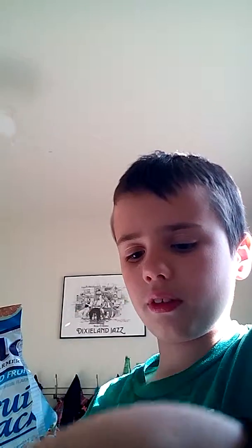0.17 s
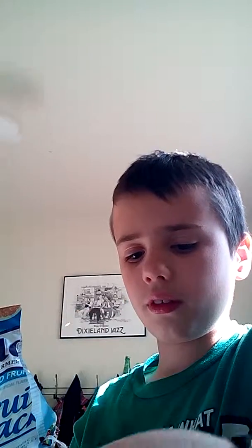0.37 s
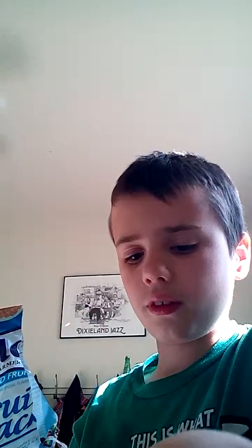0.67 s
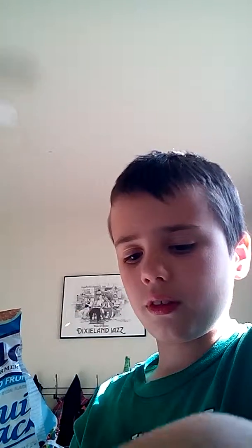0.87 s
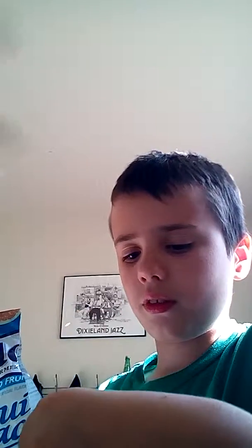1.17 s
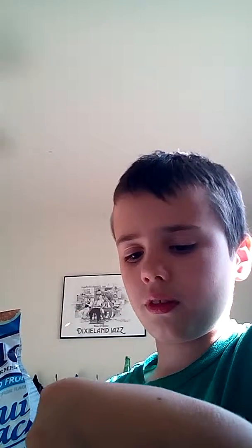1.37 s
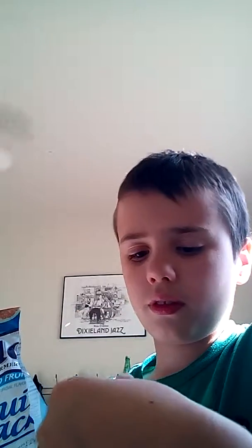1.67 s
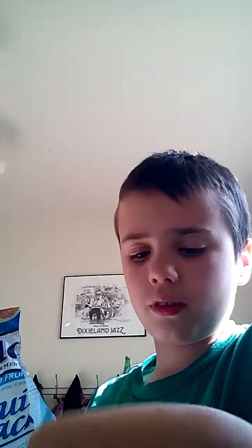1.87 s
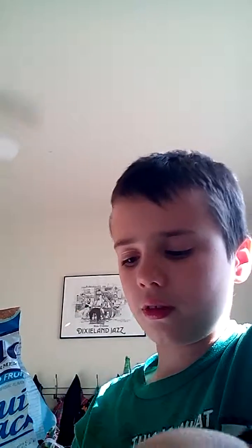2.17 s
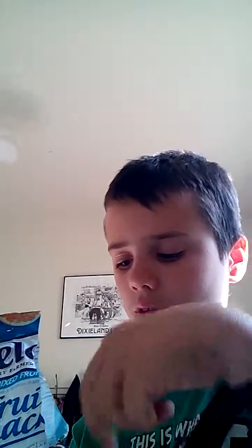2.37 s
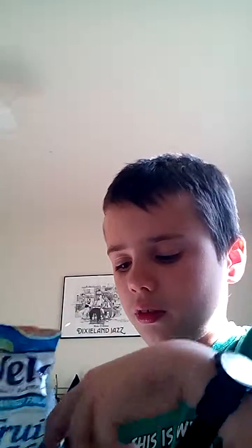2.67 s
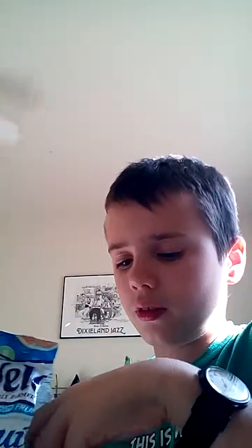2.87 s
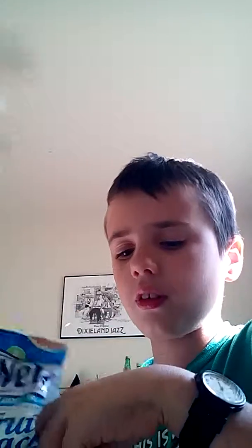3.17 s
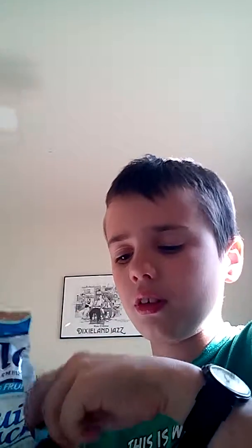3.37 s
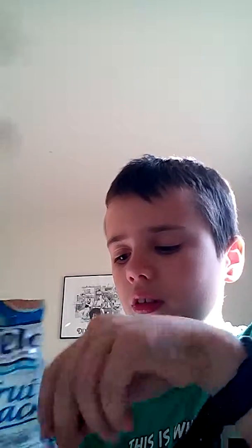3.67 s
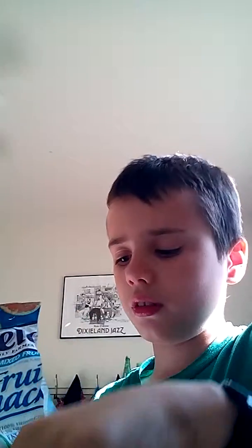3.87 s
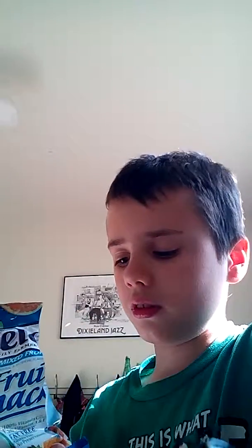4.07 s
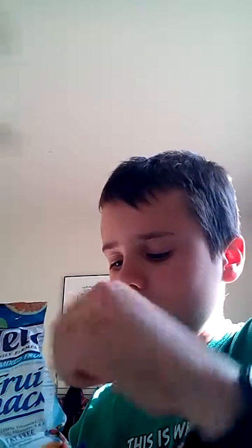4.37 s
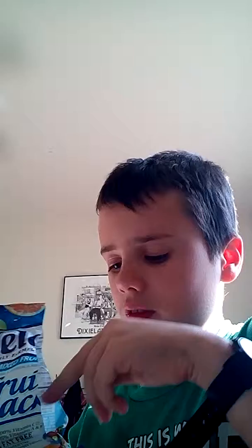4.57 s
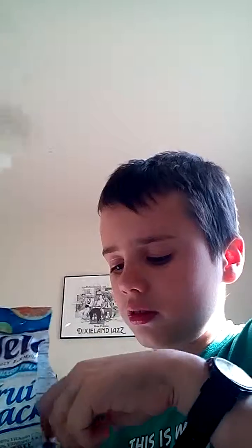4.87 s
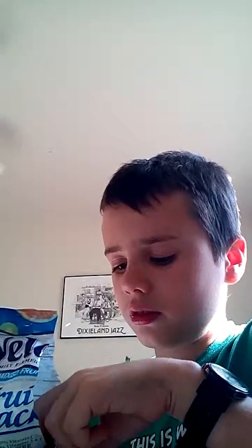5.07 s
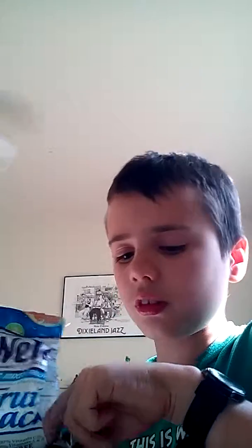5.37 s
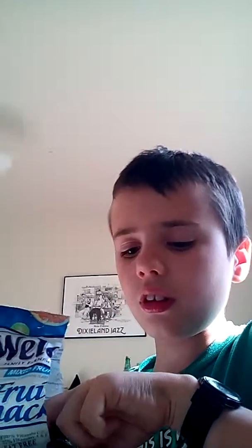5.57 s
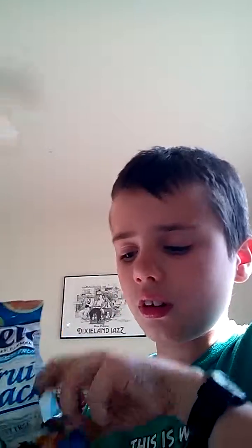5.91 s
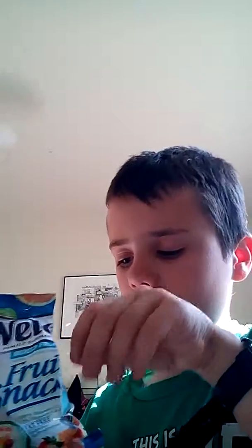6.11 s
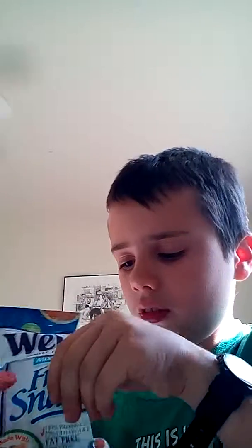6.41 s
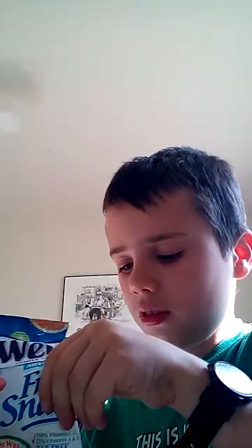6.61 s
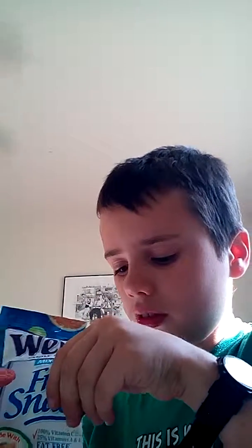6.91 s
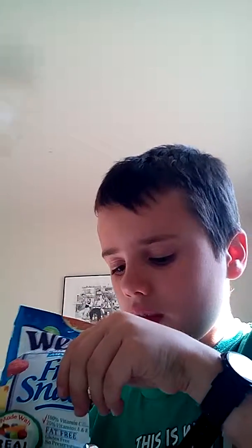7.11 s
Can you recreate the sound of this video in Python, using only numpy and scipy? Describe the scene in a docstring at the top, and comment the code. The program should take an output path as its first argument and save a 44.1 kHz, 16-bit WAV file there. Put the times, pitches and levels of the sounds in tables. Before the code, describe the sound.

Indoors, an appliance hums low under a faint hiss. Fingertips thud softly on a table, and a single crease ticks in a stiff plastic snack pouch. Then fingers dig in, making bright snaps over a fine crackle and brief rubs of skin on plastic. In a lull the fingertips land again, and a second, longer handful crunches on. The pouch is close, just left of the microphone.

```python
"""Indoors, an appliance hums under room air and the hiss of a phone's two microphone ports.
Fingertips thud on the table at about half a second, then a lone crease ticks in a stiff plastic snack
pouch just left of the phone. From 2.3 s fingers dig in: creases buckle in bright snaps over a fine
crackle and the rub of skin on film. In a lull near 4.3 s the fingertips land again, and a second handful
crunches on until about 7 s. The difference between the two ports spreads the treble wide."""
import sys
import numpy as np
from scipy import signal
from scipy.fft import rfft, irfft, next_fast_len
from scipy.io import wavfile

SR = 44100
rng = np.random.default_rng(int(sys.argv[2]) if len(sys.argv) > 2 else 0)


def transcribe(u):
    """Save the signal u as a 16-bit wav file named by the first command-line argument.

    u: samples, shape (n,) or (channels, n), limited to [-1, 1]; the rate is SR.
    q: integer samples, one column per channel.
    """
    v = np.clip(np.atleast_2d(u).T, -1, 1)
    q = np.round(v * 32767).astype(np.int16)
    wavfile.write(sys.argv[1], SR, q)


N = 319636
HZ = np.fft.rfftfreq(next_fast_len(N), 1 / SR)

# The appliance's resonances. Each row: centre in Hz, width in Hz, RMS level in dB.
HUM_BANDS = [(60.3, 4.7, -53), (104.1, 6.3, -44.5), (136.4, 35.4, -45.5), (203.8, 8.6, -48),
             (482.5, 11, -68.5)]
# The tone of room air and port hiss. Each row: frequency in Hz, relative level in dB.
AIR_TONE = [(13, -66), (22, -39.5), (36, -26), (48, -1), (202, -2.5), (295, -18), (389, -21.5), (420, -28),
            (476, -22.5), (712, -32.5), (1370, -37.5), (5220, -38), (6380, -30), (7810, -40.5), (9080, -70),
            (11800, -103), (20000, -120)]
# The stereo width of that air. Each row: frequency in Hz, side level over mid in dB.
AIR_WIDTH = [(60, -23.5), (100, -21), (180, -20), (310, -17), (550, -11.5), (950, -5), (1650, -7.5),
             (2860, -3.5), (4970, 1), (8630, 11.5)]
# Fingertips landing. Each row: start in seconds, tick peak in dB, table ring over the tick in dB.
FINGER_TAPS = [(0.555, -33, 15.5), (0.5866, -39.5, 18.5), (0.613, -44.5, 9.5), (2.36, -38, 4),
               (2.3838, -48.5, 17.5), (4.34, -38, 11.5), (4.36, -33, 9.5), (4.381, -31, 16)]
# The table top's modes. Each row: pitch in Hz, relative level in dB, time to fall 60 dB in seconds.
TABLE_MODES = [(113, -1, 0.058), (208, -3.5, 0.096), (322, -18.5, 0.093), (423, 1, 0.02),
               (873, -26.5, 0.049), (1254, -24.5, 0.039)]
# The featured creases. Each row: start in seconds, peak in dB, ring pitch in Hz, then three tone trims
# in dB: body (up to about 1 kHz), mids (near 2 kHz) and top (from about 7 kHz).
CREASES = [(0.8468, -38.5, 3300, -8, -15, -22), (2.4693, -37, 5600, -20, -24, -24),
           (2.6694, -31, 1730, 0, -16, -20), (2.7482, -30, 3340, -3, -19, -26),
           (2.8822, -33, 4800, -4, -10, -20), (2.8965, -21, 3550, 0.5, -20, -22),
           (2.9101, -9.5, 3880, -8.5, -20.5, -23), (2.9513, -14.5, 4880, -10, -20, -17),
           (2.9624, -13, 4770, -18, -18, -24), (2.9948, -30, 4940, 0, -18, -17),
           (3.053, -19.5, 4820, 4, -10, -10), (3.0793, -14, 4010, -3, -16, -16.5),
           (3.084, -23, 4040, 0, -20, -21), (3.0962, -5, 4220, -20, -22, -20.5),
           (3.0986, -9, 4680, -3, -24, -13), (3.1264, -20, 5270, -21, -18, -20),
           (3.1477, -21.5, 3520, -5, -19, -23), (3.1954, -7.5, 5070, -8.5, -19, -11),
           (3.2016, -6.5, 4060, -6.5, -19, -19), (3.2162, -10, 4030, -8.5, -31.5, -22),
           (3.242, -19, 6120, -9, -25, -13), (3.252, -21.5, 6100, -11, -14, -14),
           (3.2617, -18.5, 5410, -13, -14, -21), (3.2737, -22, 4880, -16.5, -31, -24),
           (3.2917, -14, 4540, -26, -26, -21), (3.3024, -18, 2960, -11, -12, -14),
           (3.3291, -2, 3650, -11.5, -22, -20), (3.3506, -14, 4270, -27, -28, -12),
           (3.3557, -4, 4500, -22, -27, -15), (3.3654, -17, 4130, -3, -17, -7),
           (3.3688, -2.5, 4100, -22.5, -20, -13), (3.394, -12.5, 4060, -17, -16, -9),
           (3.4357, -10, 4160, -15, -24, -15.5), (3.441, -23.5, 4230, -13, -24, -20),
           (3.488, -15.5, 4150, -11, -25, -23), (3.5196, -12, 4080, -19.5, -23, -18),
           (3.5561, -13, 4630, -26, -31, -29), (3.5872, -18.5, 4400, -19, -16, -13),
           (3.6254, -15.5, 4000, -5, -19.5, -18), (3.7258, -13.5, 4680, -11, -16, -18),
           (3.7297, -5.5, 2420, -8, -16.5, -12), (3.7549, -14.5, 5310, -5, -15, -7),
           (3.7711, -10.5, 4670, -6.5, -15, -12), (3.9577, -26, 2240, 4, -11.5, -27),
           (4.1636, -33, 6100, -27, -34, -16), (4.5072, -34.5, 3820, -28, -29, -24),
           (4.7155, -33, 3500, 5, -17, -19), (4.9354, -26, 4830, -11, -14, -15),
           (4.9569, -27.5, 3400, -6.5, -21, -21), (5.0629, -20, 3300, -11, -7, -31),
           (5.0668, -19.5, 2120, -5, -17.5, -37), (5.1698, -32.5, 4860, -15, -22, -11),
           (5.249, -16, 4940, -9.5, -18, -25), (5.2827, -33, 4430, -14, -13, -2),
           (5.3166, -11.5, 3650, -22, -22, -12), (5.3337, -9, 3970, -25, -22, -22.5),
           (5.4354, -18, 4760, -12, -15, -20), (5.464, -21, 5880, -4, -11, -16),
           (5.474, -25.5, 2620, -19, -15, -22), (5.5736, -14.5, 3700, -10.5, -28, -13.5),
           (5.5839, -7.5, 4980, -8.5, -16, -16), (5.6188, -8.5, 5100, -7, -19, -14),
           (5.6625, -15, 4450, -9, -15, -24), (5.7079, -19.5, 4800, -4, -18, -14),
           (5.7199, -21.5, 4800, -21, -20, -11), (5.7478, -25.5, 1880, -7.5, -14, -21),
           (5.7507, -32, 4280, -11, -13, -14), (5.7936, -5, 5600, -19, -29, -19.5),
           (5.8216, -13.5, 3500, -8, -11, -12), (5.8248, -13, 4900, -8, -21, -17),
           (5.9104, -38, 1570, 6, -6, -11), (5.9312, -18, 3040, -15, -13, -12),
           (5.9557, -6, 4600, -8.5, -17, -14), (5.9638, -16, 6300, -10, -26, -12),
           (6.0015, -18, 7550, -27, -24, -15), (6.0207, -25, 4800, -25, -23, -20),
           (6.0656, -12, 4800, -24.5, -26.5, -24), (6.0924, -19.5, 4270, -29, -26, -15),
           (6.1202, -17.5, 4540, -10, -20, -11), (6.135, -26, 2940, -10, -10, -9),
           (6.1614, -25, 7270, -11, -20, -7), (6.1714, -21.5, 7100, -9, -15, -10),
           (6.1834, -6.5, 4640, -10.5, -23.5, -20), (6.1869, -12.5, 3750, -16, -18, -13),
           (6.2138, -32, 4480, -14, -18, -19), (6.2546, -26, 4800, -2, -12, -19),
           (6.291, -21, 4800, 0, -15, -17.5), (6.4819, -16, 4300, -9.5, -10.5, -14),
           (6.504, -29, 4600, -13, -19, -15), (6.5252, -19, 7070, -8, -24, -21),
           (6.571, -17.5, 2640, 3, -8, -17), (6.5862, -13, 3240, 2.5, -12, -18),
           (6.5977, -5.5, 6720, -7.5, -26, -21.5), (6.6019, -3, 4570, -12, -12, -21.5),
           (6.6071, -7.5, 2620, -9, -14, -19), (6.6131, -27, 6300, -11, -18, -6),
           (6.6189, -5.5, 6800, -5, -15, -13), (6.6436, -7, 3730, -0.5, -12.5, -22.5),
           (6.6514, -13.5, 2560, -7, -12, -27), (6.697, -10, 3870, -4.5, -16, -15),
           (6.7077, -13.5, 3300, -6, -12, -12), (6.7131, -14.5, 1510, 6, -7, -16),
           (6.745, -3.5, 3440, -7.5, -14.5, -20.5), (6.7542, -13.5, 2450, -5, -19, -25),
           (6.7604, -9.5, 2790, -6, -14, -22), (6.7662, -15.5, 3460, -11, -20, -16),
           (6.813, -26.5, 2570, -4.5, -8, -14), (6.8266, -32, 1770, 3, -11, -24),
           (6.9306, -36, 2230, 0, -10, -22), (7.0194, -40, 1670, -9, -13, -14),
           (7.1048, -24.5, 3450, -7, -19, -11.5)]
# How hard the film is worked, one curve per handful. Each point: time in seconds, crackle drive in dB.
HANDFULS = [
    [(2.25, -64.5), (2.86, -69), (2.93, -41.5), (3.07, -41.5), (3.26, -41.5), (3.42, -38), (3.65, -48),
     (3.78, -46), (3.9, -66.5), (4.25, -61.5)],
    [(4.6, -66), (5.19, -56.5), (5.31, -47), (5.55, -51.5), (5.61, -45.5), (5.85, -46.5), (6.03, -50),
     (6.14, -39), (6.26, -53), (6.46, -63), (6.56, -46), (6.62, -32.5), (6.68, -41), (6.79, -52),
     (6.86, -65), (7.0, -65)],
]
# The tone of the crackling film. Each row: frequency in Hz, relative level in dB.
FILM_TONE = [(240, -54.5), (400, -17), (499, -18), (899, -7), (1120, -14), (2190, -9), (3110, -9),
             (4200, -11.5), (7370, -10.5), (9080, -46), (11800, -58), (20000, -120)]
# Skin sliding on film. Each row: start in seconds, length in seconds, crest RMS in dB, centre in Hz.
SKIN_RUBS = [(2.357, 0.1, -60, 4940), (3.04, 0.034, -40, 4800), (3.703, 0.056, -35.5, 5000),
             (4.137, .07, -74.5, 5900), (4.915, 0.055, -46, 4670), (5.156, 0.063, -46, 5000),
             (5.318, 0.057, -40.5, 4200), (5.448, 0.029, -45.5, 6900), (5.82, 0.057, -38, 5040),
             (6.098, 0.056, -39.5, 5400), (6.508, 0.029, -54, 7000)]
# The pouch's balance between the ports. Each row: frequency in Hz, left level over right in dB.
PORT_BALANCE = [(100, 7.5), (500, 2), (1000, 3.5), (2900, 4.5), (5000, 10.5), (8600, 8)]
# The left port's head start. Each row: frequency in Hz, phase lead in radians.
PORT_PHASE = [(500, 0), (1900, .3), (3500, .5), (4100, 1.2), (4700, 2.2), (5300, 2.7), (6700, 3.1),
              (9000, 3.1)]


def undb(db):
    """Decibels to gain."""
    return 10 ** (np.asarray(db) / 20)


def level(x, db):
    """Sets the RMS level."""
    return x * undb(db) / np.sqrt(np.mean(x ** 2))


def on_log(table, hz):
    """Table values joined on a log-frequency axis."""
    freqs, values = np.transpose(table)
    return np.interp(np.log(hz + 1), np.log(freqs + 1), values)


def colour(x, gain):
    """Equalises a track with one gain for each frequency in HZ."""
    size = next_fast_len(N)
    return irfft(rfft(x, size) * gain, size)[:N]


def add(out, start, sound):
    """Mixes a sound in at a start time in seconds."""
    i = int(start * SR)
    sound = sound[..., :N - i]
    out[..., i:i + sound.shape[-1]] += sound


def fade(t, t60):
    """A decay that falls 60 dB in t60 seconds."""
    return np.exp(-np.log(1000) * t / t60)


def hum_and_air(air_db=-39.5):
    """The bed, as mid and side: an appliance drones in low resonances under room air and port hiss."""
    noise = rng.standard_normal((2 + len(HUM_BANDS), N))
    tone = undb(on_log(AIR_TONE, HZ))
    mid = colour(noise[0], tone)
    side = colour(noise[1], tone * undb(on_log(AIR_WIDTH, HZ)))
    bed = np.array([mid, side]) * undb(air_db) / np.std(mid)
    for row, (hz, width, db) in zip(noise[2:], HUM_BANDS):
        resonance = 1 / (1 + (2 * (HZ - hz) / width) ** 2)
        bed[0] += level(colour(row, resonance), db)
    return bed


def finger_thuds(push_s=0.0064, nail_hz=3270, nail_db=8, tick_t60=0.032):
    """A fingertip's soft push rings the table top; the nail adds a tick."""
    out, t = np.zeros(N), np.arange(int(.25 * SR)) / SR
    tick_band = signal.butter(2, [1200, 4800], "bandpass", fs=SR, output="sos")
    nail = signal.iirpeak(nail_hz, Q=8, fs=SR)
    modes = sum(undb(db) * fade(t, t60) * np.sin(2 * np.pi * hz * t) for hz, db, t60 in TABLE_MODES)
    # flesh softens the attack; a small top radiates no deep bass
    low_cut = signal.butter(2, 70, "highpass", fs=SR, output="sos")
    ring = signal.sosfilt(low_cut, modes * (1 - np.exp(-t / push_s)))
    ring /= np.abs(ring).max()
    for start, db, ring_db in FINGER_TAPS:
        noise = rng.standard_normal(len(t))
        tick = signal.sosfilt(tick_band, noise) + undb(nail_db) * signal.lfilter(*nail, noise)
        tick *= fade(t, tick_t60)
        add(out, start, undb(db) * (undb(ring_db) * ring + tick / np.abs(tick).max()))
    return out


def room(x, t60=0.14, wet_db=-15.5):
    """The room answers with a short diffuse tail, as mid and side."""
    t = np.arange(int(.5 * SR)) / SR
    tail = rng.standard_normal((2, len(t))) * fade(t, t60) * (1 - fade(t, 0.03))
    tail /= np.sqrt(np.sum(tail[0] ** 2))
    return undb(wet_db) * signal.fftconvolve(x[None], tail, axes=1)[:, :N]


def snap(noise, ring_hz, body_db, mids_db, top_db, t60, rise_s=0.00067, ring_db=7):
    """A crease buckles and its panel rattles; each row of noise becomes one snap with a peak of 1."""
    size = noise.shape[1]
    t, hz = np.arange(size) / SR, np.fft.rfftfreq(size, 1 / SR)
    crack = undb(4) * fade(t, 0.0022)
    rattle = fade(t, max(t60, .004))
    tail = undb(-24) * fade(t, .08)
    burst = noise * (1 - np.exp(-t / rise_s)) * (crack + rattle + tail)
    burst[0, 0] = undb(10)  # the buckle itself: one jolt that sets the panel ringing
    tone_db = on_log([(200, body_db - 10), (480, body_db + 3.5), (1150, body_db - 0.5),
                      (2100, mids_db + 16), (4300, 0.0082),
                      (7200, top_db + 14), (8300, top_db + 5.5), (9100, top_db - 36)], hz)
    tone_db += ring_db * np.exp(-(np.log((hz + 1) / ring_hz) / 0.15) ** 2)  # the panel favours one pitch
    # minimum phase keeps the attack clean: nothing sounds before the pop
    cepstrum = irfft(tone_db * np.log(10) / 20)
    cepstrum[1:size // 2] *= 2
    cepstrum[size // 2 + 1:] = 0
    pop = irfft(rfft(burst) * np.exp(rfft(cepstrum)), size)
    return pop / np.abs(pop).max(axis=1, keepdims=True)


def crease_snaps(featured_t60=0.0097, small_per_s=45):
    """All creases on three tracks: their sum, their sideways lean, and scatter between the ports."""
    out = np.zeros((3, N))
    small_count = int(small_per_s * N / SR)
    creases = [(*row, featured_t60) for row in CREASES] + list(small_creases(small_count))
    most = len(CREASES) + small_count
    noise, pan_drift = rng.standard_normal((most, 2, 2048)), rng.standard_normal(most)
    for pair, drift, (start, db, *voicing) in zip(noise, pan_drift, creases):
        pan_db = -1 - 0.14 * db + 0.5 * drift  # loud creases sit nearer the middle
        lean = np.tanh(pan_db * np.log(10) / 40)
        direct, scatter = undb(db) * snap(pair, *voicing)
        add(out, start, np.array([direct, lean * direct, scatter]))
    return out


def effort_db(t):
    """How hard the fingers work the film at times t; silent outside the handfuls."""
    return np.max([np.interp(t, *np.transpose(curve), left=-120, right=-120) for curve in HANDFULS], 0)


def small_creases(count, ring_hz=4840, t60=0.019, floor_db=-80):
    """Small creases give way at random, louder with effort; rows as in CREASES plus a decay time."""
    when, force = rng.random((count, 2)).T
    pitch, body, decay, top, mids = rng.standard_normal((count, 5)).T
    start = when * N / SR
    peak_db = effort_db(start) + 7.5 + 12 * force ** 2
    hz = np.clip(ring_hz * 2 ** (0.28 * pitch), 1500, 7800)
    body_db = -10.5 + 4.4 * body
    mids_db = -12.5 + 0.36 * body_db + mids  # a fuller body brings the mids up with it
    top_db = -16 + 2.6 * top
    rows = np.transpose([start, peak_db, hz, body_db, mids_db, top_db, t60 * np.exp(.5 * decay)])
    return rows[peak_db > floor_db]


def crackle(grains_per_s=1000, spread_db=3, grain_t60=0.004, friction_db=-7, low_shelf_db=-6):
    """A fine spray of creases, most tiny and a few larger, over the smooth friction of skin on film."""
    drive = undb(effort_db(np.arange(N) / SR))
    hits = (rng.random(N) < grains_per_s / SR) * undb(spread_db * rng.exponential(size=N))
    envelope = signal.lfilter([1], [1, -fade(1 / SR, grain_t60)], hits)
    grains = level(envelope * rng.standard_normal(N), 0)
    friction = undb(friction_db) * rng.standard_normal(N)
    film = colour(grains + friction, undb(on_log(FILM_TONE, HZ)))
    thinned = colour(film, np.where(HZ < 3000, undb(low_shelf_db), 1))
    return drive * thinned / np.std(film)


def skin_rubs(width_octaves=0.5, size=8192):
    """Skin slides along the film in short, soft swells of friction hiss."""
    out = np.zeros(N)
    hz = np.fft.rfftfreq(size, 1 / SR) + 1
    for start, length, db, centre_hz in SKIN_RUBS:
        band = np.exp(-(np.log2(hz / centre_hz) / width_octaves) ** 2)
        hiss = level(irfft(rfft(rng.standard_normal(size)) * band), db)
        swell = np.hanning(int(length * SR)) ** .5
        add(out, start, hiss[:len(swell)] * swell)
    return out


def scene(scatter_db=-5, room_side_db=-1.5):
    """Mixes bed, table, room and pouch as mid and side, and returns left and right."""
    pops, lean, scatter = crease_snaps()
    pouch = pops + crackle() + skin_rubs()
    thuds = finger_thuds()
    room_mid, room_side = room(pouch + thuds)
    bed_mid, bed_side = hum_and_air()
    # the right port hears the pouch weaker and later; this sets the side signal for a given mid
    right_port = undb(-on_log(PORT_BALANCE, HZ)) * np.exp(-1j * on_log(PORT_PHASE, HZ))
    width = (1 - right_port) / (1 + right_port)
    # hands and phone body scatter each pop differently to the two ports
    diffuse = undb(scatter_db) * scatter + undb(room_side_db) * room_side
    mid = bed_mid + thuds + room_mid + pouch + colour(lean, width)
    side = bed_side + colour(pouch, width) + lean + colour(diffuse, np.abs(width) ** 0.45)
    return np.array([mid + side, mid - side])


def record(dry, dip_hz=1118, dip_width_hz=227, dip_db=-3.5, ceiling=1.05, top_hz=9132):
    """The microphone dips near 1 kHz, the loudest pops are squashed, the top is cut steeply."""
    dip = undb(dip_db * np.exp(-((HZ - dip_hz) / dip_width_hz) ** 2))
    heard = np.array([colour(channel, dip) for channel in dry])
    squashed = ceiling * np.tanh(heard / ceiling)
    top_cut = signal.ellip(12, .2, 90, top_hz, fs=SR, output="sos")
    return signal.sosfilt(top_cut, squashed)


dry = scene()
out = record(dry)
transcribe(out)
```